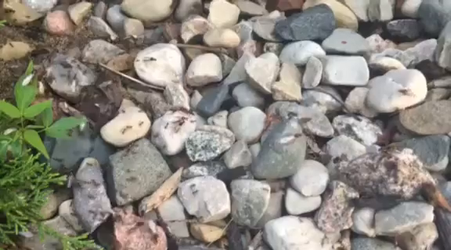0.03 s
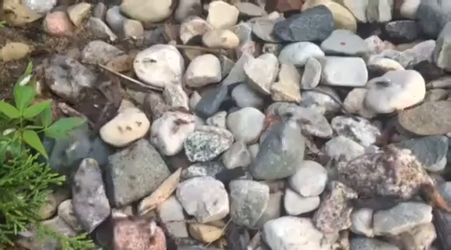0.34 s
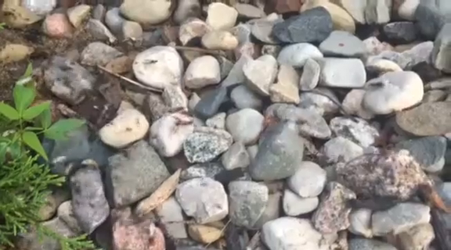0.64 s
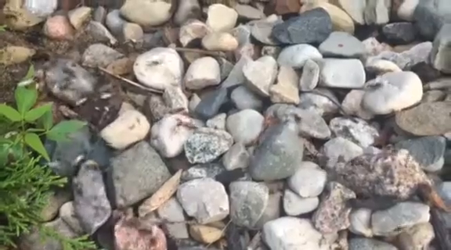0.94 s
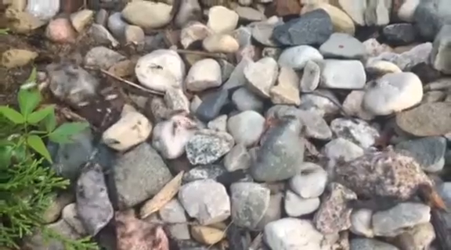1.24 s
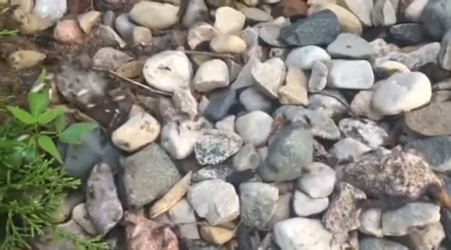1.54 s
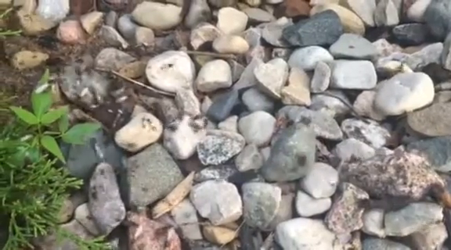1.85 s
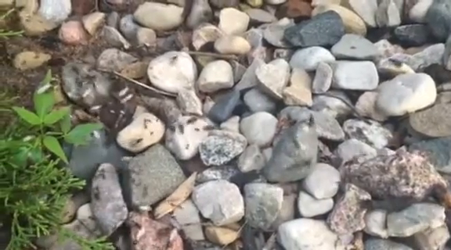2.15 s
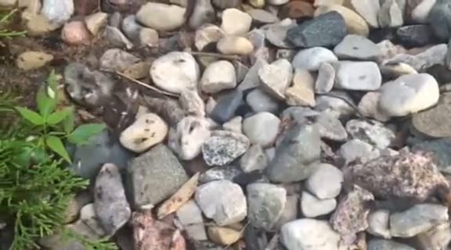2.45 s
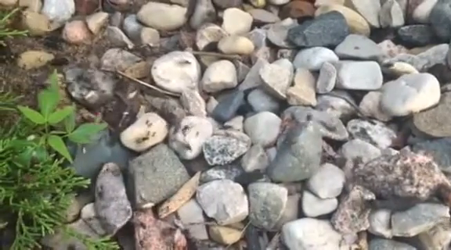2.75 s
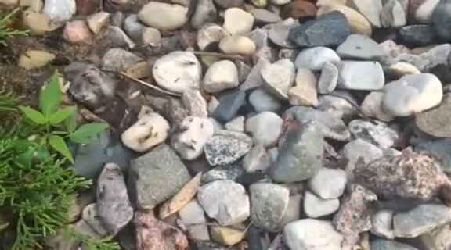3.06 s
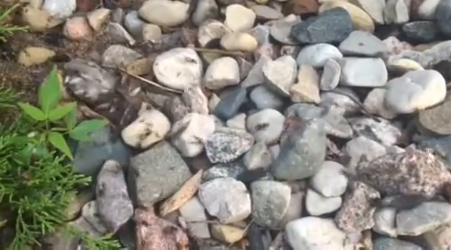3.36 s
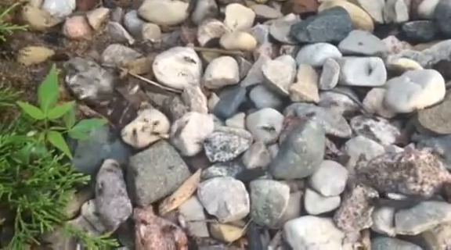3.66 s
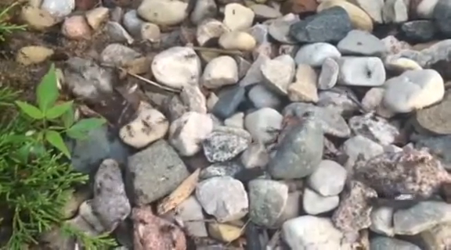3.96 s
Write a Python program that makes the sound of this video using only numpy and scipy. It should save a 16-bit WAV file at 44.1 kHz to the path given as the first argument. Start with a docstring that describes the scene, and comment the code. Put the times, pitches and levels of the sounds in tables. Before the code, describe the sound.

Far-off traffic hums quietly in the open air, with a low engine drone that weakens and tyre noise that slowly recedes. A passing car briefly adds brighter hiss, and faint throbs and whines come and go under a thin insect-like shimmer.

```python
"""Distant traffic, heard outdoors over a pebble bed: one engine drones near 180 Hz and eases off above
a low rumble and a wash of tyre noise that slowly recede. Other motors hum and beat against it, low
throbs and faint whines come and go, and one passing car adds a brighter hiss. A thin shimmer near
6 kHz, probably insects, lies on the hiss of the open air. The sound cuts in after a moment of silence."""
import sys
import numpy as np
from scipy import signal
from scipy.fft import rfft, irfft
from scipy.io import wavfile

SR = 44100
rng = np.random.default_rng(int(sys.argv[2]) if len(sys.argv) > 2 else 0)


def wav_out(sig):
    """Save sig, one row per channel (or a flat mono array), as 16-bit PCM at SR to the path in sys.argv[1]."""
    wavfile.write(sys.argv[1], SR, np.round(np.clip(np.atleast_2d(sig).T, -1, 1) * 32767).astype(np.int16))


N = 176400


def from_db(db):
    """Decibels to gain."""
    return 10 ** (np.asarray(db) / 20)


def unit_rms(x):
    """Scale to rms 1."""
    return x / np.sqrt(np.mean(x ** 2) + 1e-20)


def seconds():
    """The time of every sample."""
    return np.arange(N) / SR


def automation(points):
    """Straight ramps between (time, value) breakpoints."""
    return np.interp(seconds(), *np.transpose(points))


def drift(rate_hz):
    """Smooth random modulator with spread 1, moving at about the given rate."""
    hop, run_in = 40, 2000
    pole = np.exp(-2 * np.pi * rate_hz * hop / SR)
    noise = rng.standard_normal(N // hop + run_in + 2)
    slow = signal.lfilter([1], [1, -2 * pole, pole * pole], noise)[run_in:]
    return np.interp(np.arange(N) / hop, np.arange(len(slow)), unit_rms(slow - slow.mean()))


def tone(hz):
    """A sine of rms 1 that follows a pitch curve, from a random phase."""
    return np.sqrt(2) * np.sin(2 * np.pi * (np.cumsum(hz) / SR + rng.random()))


def flutter(depth_db, rate_hz):
    """Fading of a far sound in moving air, mean power 1."""
    return unit_rms(from_db(depth_db * drift(rate_hz)))


def wash(eq, flutter_db, rate_hz, bands=24):
    """Noise shaped by an EQ curve, each band fading on its own; rms 1."""
    eq_hz, eq_db = np.transpose(eq)
    log_hz = np.log(np.maximum(np.arange(N // 2 + 1) * SR / N, 1))
    spectrum = rfft(rng.standard_normal(N)) * from_db(np.interp(log_hz, np.log(eq_hz), eq_db))
    band_of_bin = np.round(np.interp(log_hz, np.log(eq_hz[[0, -1]]), [0, bands - 1]))
    slices = (irfft(spectrum * (band_of_bin == k), N) for k in range(bands))
    return unit_rms(sum(band * flutter(flutter_db, rate_hz) for band in slices))


# Pitch curve of the nearest engine, sagging slightly: (time [s], pitch [Hz])
DRONE_PITCH = [(.15, 181), (.55, 179.6), (1.3, 180.1), (2.0, 177.1), (4, 175.8)]
# Its fader ride: (time [s], level [dB])
DRONE_LEVEL = [(.15, -40), (.55, -39.5), (.75, -43), (.95, -38.5), (1.15, -49), (1.4, -39), (1.58, -53.5),
               (2.2, -45.5), (3.0, -50.5), (4, -47.5)]


def engine_drone():
    """The firing note of the nearest engine, with a weak octave on top."""
    waver_hz, octave_db = 0.48, -31
    hz = automation(DRONE_PITCH) + waver_hz * drift(rate_hz=3.24)
    note = tone(hz) + from_db(octave_db) * tone(2 * hz)
    return from_db(automation(DRONE_LEVEL)) * flutter(depth_db=.8, rate_hz=6.2) * note


# Motors further off: (pitch [Hz], start level [dB], end level [dB], pitch waver [Hz])
MOTORS = [(51, -67.5, -55, 1.7), (76.5, -61.5, -61, 1.16), (100.3, -53.5, -51.5, 1.2),
          (120.5, -54, -52, 1.4), (126.9, -59, -54, 1.3), (147.6, -68, -58.5, 2.5),
          (191.45, -57, -48.5, 0.65), (231.3, -58, -66, 2.5), (356.7, -67, -71.5, 4.91)]


def far_motors():
    """Wavering motor hums that slowly grow or fade and beat against each other."""
    hums = np.zeros(N)
    for hz, start_db, end_db, waver_hz in MOTORS:
        gain = from_db(np.linspace(start_db, end_db, N)) * flutter(depth_db=3, rate_hz=3.8)
        hums += gain * tone(hz + waver_hz * drift(rate_hz=5.85))
    return hums


# Bass-heavy EQ of the rumble: (frequency [Hz], gain [dB])
RUMBLE_EQ = [(20, -35), (35, -32), (47, -2.5), (65, -1), (90, -3), (130, 0), (155, -1.5), (190, 4),
             (215, -5), (270, -8.5), (330, -14.5), (450, -17), (700, -33.5), (1500, -61)]
# Its fader ride: (time [s], level [dB])
RUMBLE_LEVEL = [(.15, -48), (1.0, -46.5), (1.8, -48.5), (2.6, -48.5), (3.2, -48), (4, -50)]


def traffic_rumble():
    """The low bed of far traffic, gently uneven with distance."""
    return from_db(automation(RUMBLE_LEVEL)) * wash(RUMBLE_EQ, flutter_db=1.54, rate_hz=11.8)


# Midrange EQ of the far tyres: (frequency [Hz], gain [dB])
ROAR_EQ = [(150, -9), (300, 3.5), (500, 3), (700, -0.5), (830, -1.5), (1000, 1), (1250, -2.5), (1400, -3.5),
           (2000, -8), (3000, -17.5), (6000, -36.5)]
# Their fader ride: (time [s], level [dB])
ROAR_LEVEL = [(.15, -61), (.5, -59.5), (.88, -58.5), (1.15, -63), (1.8, -63), (2.6, -63), (3.3, -64.5),
              (4, -64.5)]


def tyre_roar():
    """Far tyres merge into a receding wash, made patchy by the distance."""
    return from_db(automation(ROAR_LEVEL)) * wash(ROAR_EQ, flutter_db=3.4, rate_hz=9.3, bands=40)


# Brighter EQ of one car's tyres: (frequency [Hz], gain [dB])
PASS_BY_EQ = [(800, -19), (1500, 0.5), (2100, 0.5), (2900, 1), (3400, -4), (4500, -8.5), (8000, -24),
              (15000, -48)]
# The pass-by, cresting near 1.4 s: (time [s], level [dB])
PASS_BY_LEVEL = [(.15, -74.5), (.7, -74), (.98, -71.5), (1.42, -67.5), (1.75, -70.5), (2.0, -70.5),
                 (2.6, -76), (4, -75)]


def passing_car():
    """The tyre hiss of one car swells and falls away as it passes."""
    return from_db(automation(PASS_BY_LEVEL)) * wash(PASS_BY_EQ, flutter_db=4.0, rate_hz=9.6, bands=64)


# EQ of the outdoor air: (frequency [Hz], gain [dB])
AIR_EQ = [(500, 3), (2000, 1.5), (3400, -2), (4500, -.3), (5500, 1.9), (6400, 3.5), (7600, 0), (8300, -0.4),
          (8900, -4), (10500, -13), (16000, -15)]
# Its slow fade: (time [s], level [dB])
AIR_LEVEL = [(.15, -64.5), (1.4, -65.5), (2.6, -66.5), (3.3, -67), (4, -69.5)]


def open_air():
    """The smooth, bright background hiss of the open air."""
    return from_db(automation(AIR_LEVEL)) * wash(AIR_EQ, flutter_db=1.0, rate_hz=6.8)


# Nearly flat EQ of the noise floor: (frequency [Hz], gain [dB])
MIC_HISS_EQ = [(2000, -2), (10500, -1.8), (13500, 0.46), (16000, -1)]


def mic_hiss():
    """The microphone's own faint, almost steady hiss."""
    return from_db(-76.5) * wash(MIC_HISS_EQ, flutter_db=-0.5, rate_hz=1, bands=1)


# Fader ride of the insect shimmer: (time [s], level [dB])
INSECT_LEVEL = [(.15, -75.5), (1.3, -79), (2.0, -77.5), (2.7, -85), (3.2, -83), (3.7, -75), (4, -85)]


def insects(voices=3):
    """A few faint throbbing trills of wandering pitch blur into a shimmer."""
    centre_hz, wander_hz, blur_hz = 6130, 170, 88
    trills = np.zeros(N)
    for _ in range(voices):
        throb = flutter(depth_db=5.5, rate_hz=15)
        trills += throb * tone(centre_hz + wander_hz * drift(rate_hz=7) + blur_hz * drift(rate_hz=198))
    return from_db(automation(INSECT_LEVEL)) * unit_rms(trills)


def swell(peak_s, half_length_s, hz, db, waver_hz):
    """A rough, wavering tone that rises and sinks under a bell-shaped envelope."""
    envelope = from_db(db) * np.exp(-((seconds() - peak_s) / half_length_s) ** 2 / 2)
    roughness = flutter(depth_db=3.5, rate_hz=27)
    return envelope * roughness * tone(hz + waver_hz * drift(rate_hz=2 * waver_hz + 10))


# Bass swells: (peak time [s], half length [s], pitch [Hz], level [dB], pitch waver [Hz])
THROBS = [(0.3, .12, 119, -48.5, 4), (1.9, 0.064, 119, -45, 6), (3.18, 0.069, 112, -44.5, 10.25),
          (1.67, 0.34, 56, -59, 7.4), (1.5, .015, 210, -41, 4), (3.84, .04, 200, -44, 5.9),
          (0.71, 0.25, 275, -59, 13)]


def low_throbs():
    """Low notes well up in the traffic rumble and sink back."""
    return sum(swell(*throb) for throb in THROBS)


# Tyre and gear whines: (peak time [s], half length [s], pitch [Hz], level [dB], pitch waver [Hz])
WHINES = [(.63, 0.26, 663, -63, 3.6), (0.67, 0.36, 782, -71.5, 10), (0.49, 0.045, 1210, -61.5, 42),
          (0.846, 0.033, 1080, -63, 91), (0.91, .05, 830, -63, 70), (0.8, 0.21, 1142, -71, 16),
          (0.78, 0.24, 690, -67, 20.2), (1.07, 0.57, 478, -66.5, 11.3), (1.78, .03, 650, -62.5, 45.5),
          (1.97, .04, 670, -64.5, 51), (2.24, 0.021, 700, -59, 28), (2.91, 0.068, 462, -60, 19),
          (3.66, .4, 469, -67, 7.8), (2.68, 0.69, 535, -72, 15), (1.54, 0.14, 965, -71.5, 20.6),
          (1.06, 0.14, 345, -62, 14.3), (1.71, 0.055, 350, -57.5, 13.66), (0.69, .12, 3080, -74, 70),
          (.78, .04, 2500, -66, 35), (1.17, .07, 2590, -74, 72), (1.49, 0.16, 2790, -74.5, 90),
          (1.5, .2, 2080, -73, 115), (1.99, .04, 2950, -72, 83)]


def whines():
    """Tyres and gears sing briefly above the wash."""
    return sum(swell(*whine) for whine in WHINES)


def scene():
    """The mono mix: engines, road noise and ambience, with brief swells on top."""
    engines = engine_drone() + far_motors()
    road = traffic_rumble() + tyre_roar() + passing_car()
    ambience = open_air() + mic_hiss() + insects()
    return (engines + road + ambience + low_throbs() + whines())[None]


def record(dry):
    """A hard cut in from silence, then a steep low-pass on the very top."""
    cut_in_s, stopband_hz = .1502, 15800
    low_pass = signal.cheby2(20, 60, stopband_hz, fs=SR, output="sos")
    return signal.sosfilt(low_pass, dry * (seconds() >= cut_in_s))


dry = scene()
out = record(dry)
wav_out(out)
```